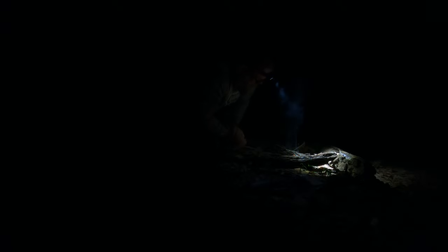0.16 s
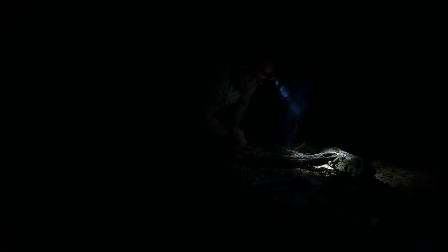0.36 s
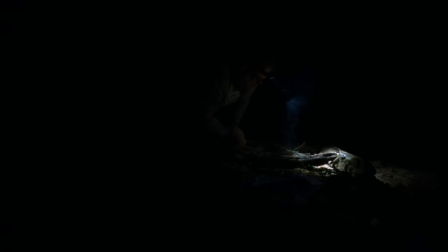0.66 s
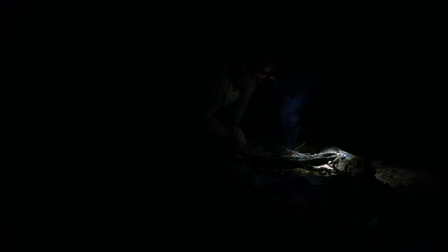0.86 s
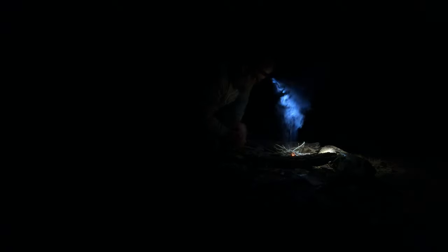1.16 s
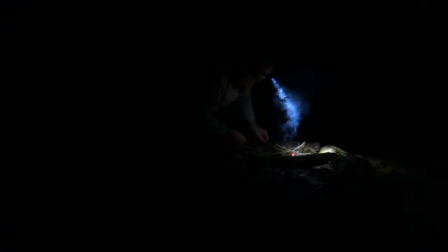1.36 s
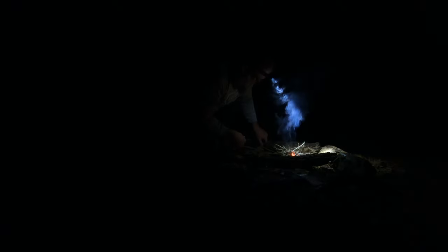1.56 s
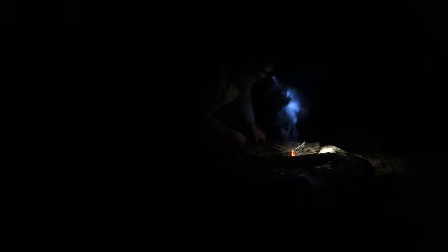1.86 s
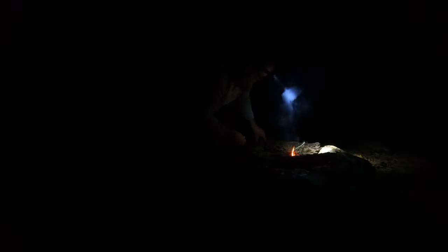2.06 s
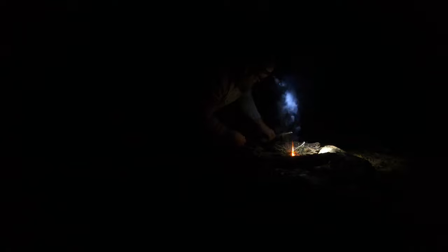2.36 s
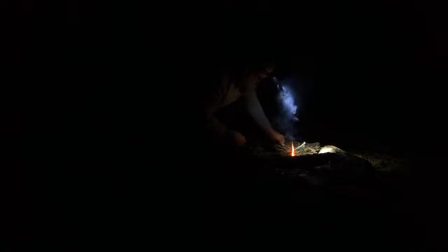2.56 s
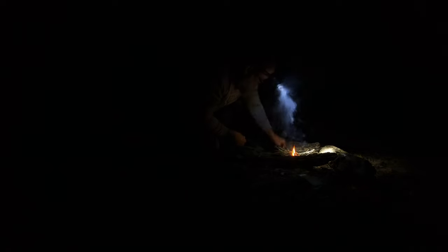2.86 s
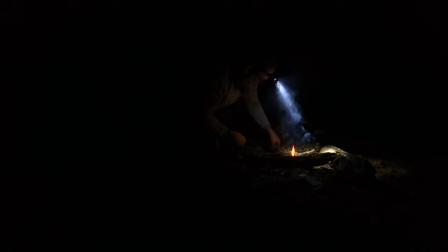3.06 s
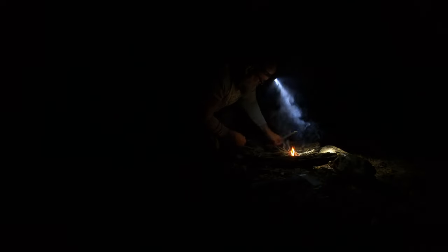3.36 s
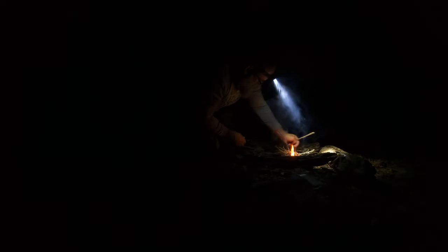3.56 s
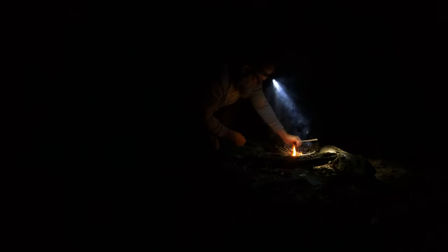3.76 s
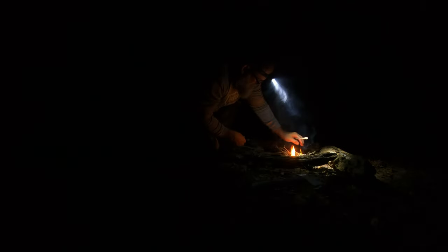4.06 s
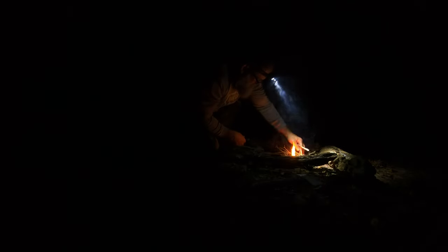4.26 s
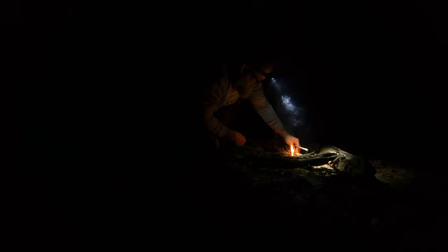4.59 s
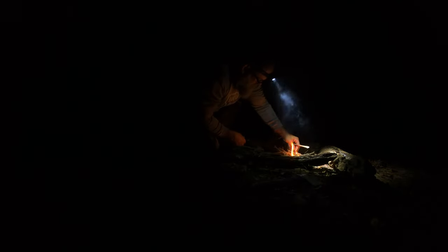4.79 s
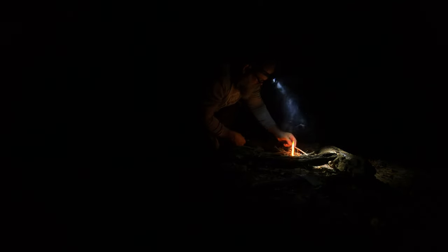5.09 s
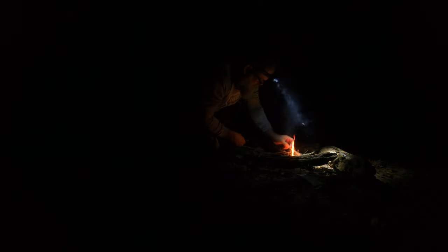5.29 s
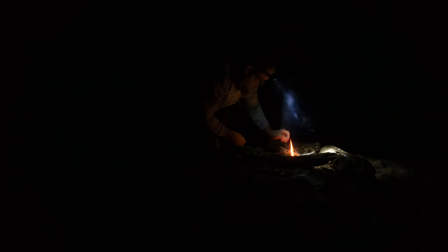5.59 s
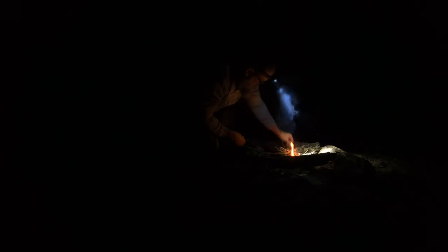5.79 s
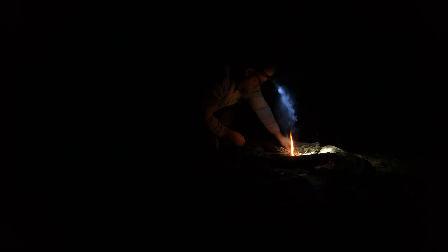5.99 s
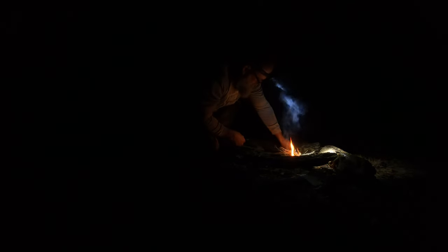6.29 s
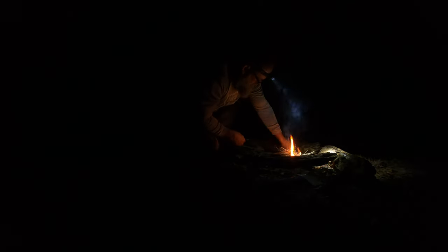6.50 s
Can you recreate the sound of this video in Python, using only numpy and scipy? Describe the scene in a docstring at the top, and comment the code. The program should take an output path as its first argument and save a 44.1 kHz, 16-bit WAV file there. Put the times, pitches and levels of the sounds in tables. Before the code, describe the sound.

Someone tends a small twig fire in dark woods. Dry sticks crack brightly, fine litter crackles and hisses after each break, and a stick knocks faintly. The strongest cracks come mid-way, with the background dipping briefly behind them; later snaps are weaker. Steady insect trills fill the wide stereo field, nearest ones mostly left, over wind rumble, faint low whistle and soft leaves. Soft thuds close the stretch.

```python
"""A campsite at night. From the first moment insects trill in two bands, near singers pulsing over a far blur.
A breeze rumbles on the microphone throughout, whistles faintly round the camera body and stirs the leaves.
Before the first second is out a small fire snaps and a stick knocks; crumbling litter rustles after them.
Dull thuds come through the ground at 1.6 s and near the end. The two loudest snaps fall at 2.6 and 3.5 s;
the trees scatter each snap, and the camera ducks its gain after loud peaks."""
import sys
import numpy as np
from scipy import signal
from scipy.fft import rfft, irfft, next_fast_len
from scipy.io import wavfile
from scipy.ndimage import uniform_filter1d, map_coordinates

SR = 44100
rng = np.random.default_rng(int(sys.argv[2]) if len(sys.argv) > 2 else 0)


def digitize_waveform(pressure):
    """Quantize a signal to 16-bit integers and store it at the path in sys.argv[1].

    Rows of a 2-D input are taken as channels; values are limited to [-1, 1].
    """
    field = np.atleast_2d(pressure).T
    bounded = np.clip(field, -1, 1)
    quanta = np.round(bounded * 32767).astype(np.int16)
    wavfile.write(sys.argv[1], SR, quanta)


N = 292824


def amp(db):
    """Turn dB into gain."""
    return 10 ** (np.asarray(db) / 20)


def unit(x):
    """Scale to an rms of 1."""
    return x / np.sqrt(np.mean(x ** 2) + 1e-20)


def peak(x):
    """Scale so the highest point is 1."""
    return x / np.abs(x).max()


def along(points, hz):
    """Read a curve of (Hz, value) points on a log frequency axis."""
    point_hz, value = np.transpose(points)
    return np.interp(np.log(hz + 1), np.log(point_hz + 1), value)


def curves(rows):
    """Give one value per sample for each column after the time."""
    s, *columns = np.transpose(rows)
    return [np.interp(np.arange(N) / SR, s, column) for column in columns]


def wobble(rate):
    """Draw a smooth random curve with so many knots a second."""
    knots = rng.standard_normal(int(N * rate / SR) + 4)
    return map_coordinates(knots, [np.arange(N) * rate / SR])


def filtered(x, response):
    """Filter x by a complex response of frequency."""
    m = next_fast_len(x.shape[-1] + SR // 2)  # silence at the end leaves room for ringing
    spectrum = rfft(x, m) * response(np.fft.rfftfreq(m, 1 / SR))
    return irfft(spectrum, m)[..., :x.shape[-1]]


def modes(table):
    """Add up a few resonances, every second one with its sign flipped."""
    def response(f):
        return sum((-1) ** k * amp(db) * 1j * f * width / (hz * hz - f * f + 1j * f * width)
                   for k, (hz, width, db) in enumerate(table))
    return response


def sides(pan_db):
    """Left and right gains that differ by pan_db; positive is louder on the left."""
    return amp([[pan_db / 2], [-pan_db / 2]])


def late_left(x, lag):
    """A source on the right reaches the left port later, by lag samples."""
    return filtered(x, lambda hz: np.exp(-1j * np.pi * hz * lag / SR * np.array([[1], [-1]])))


def rush(spectrum, alike, pan_db, patchy_db, lag=0):
    """Stereo noise with a given colour and likeness of the two sides, in patches of random gain."""
    z = signal.stft(rng.standard_normal((2, N)), nperseg=512)[2]
    # smooth the random gains across frequency, then across time
    field = uniform_filter1d(rng.standard_normal(z.shape[1:]), size=5, axis=0)
    field = uniform_filter1d(field, size=16, axis=1)
    pair = signal.istft(z * amp(patchy_db * unit(field)), nperseg=512)[1][:, :N]
    coloured = filtered(pair, lambda hz: amp(along(spectrum, hz)))
    turn = np.arccos(np.clip(alike, -1, 1)) / 2
    mid, side = coloured * [[np.cos(turn)], [np.sin(turn)]]
    return sides(pan_db) * late_left(unit(np.array([mid + side, mid - side])), lag)


def add(track, s, sound):
    """Mix a sound in at s seconds."""
    part = track[:, round(s * SR):][:, :sound.shape[1]]
    part += sound[:, :part.shape[1]]


# how long the trees keep scattering each pitch: (pitch_hz, fade_by_60_db_s)
TREE_FADE = [(500, 0.18), (3000, 0.77), (8000, 0.62), (14000, 0.07)]


def trees(length):
    """Trees scatter sound into one noisy tail per ear; each frequency dies at its own speed."""
    hz, t, z = signal.stft(rng.standard_normal((2, int(length * SR))), SR, nperseg=256)
    fade = amp(-60 * t / along(TREE_FADE, hz)[:, None])
    tail = signal.istft(z * fade, SR, nperseg=256)[1]
    return tail / np.linalg.norm(tail[0])


# pulse rate at the middle pitch, and how much it grows per Hz: higher singers pulse faster
MIDDLE_HZ, PULSES_PER_S, PULSES_PER_HZ = 3640, 32.3, .0047


def trill(length, hz, tempo=1):
    """Short tone pulses at a steady rate; a weaker voice sounds near half the pitch."""
    t = np.arange(int(length * SR)) / SR
    rate = tempo * (PULSES_PER_S + PULSES_PER_HZ * (hz - MIDDLE_HZ))
    beat = rate * t
    since = beat % 1 / rate  # seconds since this pulse began
    # each pulse gets its own loudness, pitch and phase
    chance = rng.standard_normal((int(beat[-1]) + 1, 3))[beat.astype(int)]
    pulse = since ** 2 * np.exp(-since / .0034) * amp(2. * chance[:, 0])
    # the pitch rises into the trill and sags at its end
    arc = 1 - 0.018 * (2 * t / length - 1) ** 2
    turn = 2 * np.pi * hz * arc * (1 + .006 * chance[:, 1]) * since
    tone = np.sin(turn + 9 * chance[:, 2]) + amp(-17.0) * np.sin(.53 * turn)
    swell = np.clip(np.minimum(t / 0.054, (length - t) / 0.022), 0, 1)
    return unit(pulse * tone) * swell


# the nearest singers: (start_s, length_s, pitch_hz, level_db, left_minus_right_db)
NEAREST_TRILLS = [(.009, 0.47, 4050, -54.5, 9), (.009, 0.29, 3500, -59, 5), (0.606, 0.83, 3850, -60, -8),
                  (0.771, 0.5, 3649, -46, 9), (1.552, 0.44, 3894, -48.5, 11.5),
                  (2.104, 0.3, 3467, -58.5, 23), (2.989, 0.41, 4090, -51, 0), (3.035, 0.5, 3648, -49, 9.5),
                  (3.765, 0.43, 3880, -57, 13), (4.155, 0.55, 3758, -48, -2), (4.856, 0.47, 3536, -52, 10),
                  (5.292, 0.58, 3797, -55.5, 16.5), (5.872, 0.41, 4030, -48.5, 3),
                  (5.891, 0.41, 3630, -49.5, 10.5)]


def near_singers():
    """Insects close enough to keep their separate pulses, with an echo from the trees."""
    near = np.zeros((2, N))
    for s, length, hz, db, pan_db in NEAREST_TRILLS:
        add(near, s, amp(db) * sides(pan_db) * trill(length, hz))
    # a crowd a little farther off takes turns, each at its own tempo
    for k, (when, pitch, loud, pan, pace) in enumerate(rng.uniform(size=(100, 5))):
        song = trill(0.498, 3400 + 750 * pitch, .85 + .4 * pace)
        add(near, (k + when) / 100 * N / SR, amp(-59.0 + 5. * loud) * sides(8 * pan) * song)
    near = late_left(near, 1.95)
    echo = signal.fftconvolve(near.mean(0)[None], trees(.4), axes=1)[:, :N]
    return near + amp(-6) * echo


# loudness of the far singers: (time_s, high_band_db, low_band_db)
FAR_LEVELS = [(0.0, -40, -54.5), (0.7, -43.5, -56), (0.91, -42.5, -56), (2.31, -42, -55.5),
              (2.77, -41, -53.5), (3.31, -42, -55), (3.66, -42, -52), (4.36, -43.5, -56),
              (6.01, -41, -53.5), (6.64, -43.5, -54.5)]
# colour of the high band: (pitch_hz, relative_db_per_hz)
HIGH_BAND = [(1590, -72), (2700, -34.5), (3000, -22), (3160, -16.5), (3250, -9), (3420, -3.5), (3650, 2),
             (4000, -4.5), (4250, -7.5), (4600, -11), (4800, -18.5), (5320, -20.5), (6200, -50),
             (8060, -78.5), (13600, -120)]
# colour of the low band: (pitch_hz, relative_db_per_hz)
LOW_BAND = [(850, -30), (1450, -28.5), (1680, -14), (1920, -0.5), (2020, 2), (2350, -17.5), (2600, -34),
            (3380, -63), (5720, -120)]
# colour of far, high insects: (pitch_hz, relative_db_per_hz)
HIGH_INSECTS = [(4500, -2), (6300, -5.5), (7500, 1), (9200, -5), (10200, -21.5), (12500, -16.5),
                (15600, -31.5), (15900, -71.5)]


def far_singers():
    """So many far insects overlap that they blur into two rough bands and a faint high hiss."""
    high_db, low_db = curves(FAR_LEVELS)
    far = amp(high_db) * rush(HIGH_BAND, .3, pan_db=4.5, patchy_db=.6, lag=2.)
    far += amp(low_db) * rush(LOW_BAND, 0.96, pan_db=2.0, patchy_db=1.3, lag=3.1)
    return far + amp(-67.0) * rush(HIGH_INSECTS, 0.03, pan_db=-1.0, patchy_db=1.5)


def insects():
    """The whole chorus: separate pulses up close over a far blur."""
    return near_singers() + far_singers()


# kindling snaps, levels before the treble is dulled:
# (start_s, thin_wood_peak_db, thick_minus_thin_wood_db, splinters_against_break_db)
KINDLING_SNAPS = [(0.6903, -14.5, -23.5, -18), (1.8143, -40, -14, -14), (2.04, -33.5, -23, -18),
                  (2.312, -35, -30, -9), (2.56, 9.5, -20, -25.5), (2.6309, -22, -18, -19),
                  (2.662, -25.5, -26, -16), (2.765, -38, -4, -8), (3.052, -31, -14.5, -23.5),
                  (3.356, -36, 5.5, -20), (3.538, 5.5, -18.5, -23), (3.6665, -28, -13, -14.5),
                  (3.6817, -13.5, -18.5, -14), (4.4667, -42, -13, -9), (4.4946, -34.5, -3.5, -21),
                  (4.7091, -17.5, -24, -23), (4.7845, -36, -10, -12), (4.8164, -36, -21, -16),
                  (5.405, -38.5, -20, -10)]
# how thin dry wood rings: (pitch_hz, width_hz, level_db)
THIN_WOOD = [(4790, 1730, -1.5), (8500, 1030, 1), (11760, 3100, -6)]
# how thicker wood rings: (pitch_hz, width_hz, level_db)
THICK_WOOD = [(1150, 153, 8), (481, 380, -1), (2140, 870, 6.5), (220, 190, -4)]
# treble corner of a 0 dB snap; weaker snaps are a little duller
BRIGHT_HZ, DULLER_PER_DB = 10800, .004


def snaps():
    """A sharp blow rings thin and thick wood, with splinters, a smeared echo and a tail from the trees."""
    out, t = np.zeros((2, N)), np.arange(SR // 20) / SR
    for s, db, body_db, splinter_db in KINDLING_SNAPS:
        # fibres tear faintly for a millisecond before the break and shower after it
        fibres = rng.standard_normal((3, len(t)))
        shower = amp(-60 * np.clip(t - .001, 0, 1) / .014) * np.where(t < .001, .35, 1)
        echo = amp(-38 - 60 * (t - .012) / .025) * (t > .012)
        both_ears = fibres[0] + .5 * fibres[1:]  # one shared noise and one for each ear
        blow = (amp(splinter_db) * shower + echo) * both_ears
        blow[:, SR // 1000] += 1  # the break itself
        thin = peak(filtered(blow, modes(THIN_WOOD)))
        thick = peak(filtered(blow, modes(THICK_WOOD))) * amp(body_db)
        corner_hz = BRIGHT_HZ * np.exp(DULLER_PER_DB * db)
        snap = filtered(thin + thick, lambda hz: 1 / (1 + 1j * hz / corner_hz) ** 3)
        add(out, s, amp(db) * snap)
        add(out, s + 0.0073, amp(db - 26) * signal.fftconvolve(snap, trees(0.17), axes=1))
    return out


# sticks laid down or ticking: (start_s, level_db, pitch_hz, fade_by_60_db_s)
STICK_KNOCKS = [(0.812, -49, 1320, 0.023), (1.587, -37, 553, 0.035), (5.405, -42, 5730, 0.02),
                (5.830, -40, 616, .025)]
# extra tones in a knock: (multiple_of_pitch, level_db, share_of_fade_time)
STICK_OVERTONES = [(1.62, -7, 0.6), (2.3, -9, 0.51), (3.3, -8, .3)]
BOUNCE_S, BOUNCE_DB = .011, -12  # a stick lands twice


def knocks():
    """A stick rings at a few fading tones with a short burst of contact noise, then bounces once."""
    out, t = np.zeros((2, N)), np.arange(SR // 20) / SR
    for s, db, hz, t60 in STICK_KNOCKS:
        ring = np.zeros(len(t))
        for multiple, tone_db, share in [(0.99, 0, 0.83)] + STICK_OVERTONES:
            if multiple * hz < 12000:
                ring += amp(tone_db - 60 * t / (share * t60)) * np.sin(2 * np.pi * multiple * hz * t)
        attack = 1 - np.exp(-t / 0.00096)
        contact = amp(-60 * t / 0.0046) * uniform_filter1d(rng.standard_normal(len(t)), size=16)
        knock = (ring * attack + .5 * contact)[None]
        add(out, s, amp(db) * knock)
        add(out, s + BOUNCE_S, amp(db + BOUNCE_DB) * knock)
    return out


# samples by which the left port hears the fire late
FIRE_LAG = 1.75
# the camera shades its left port from the fire: (pitch_hz, left_minus_right_db)
FIRE_SHADE = [(200, -1), (1500, -2), (4400, -1), (8000, -3), (15000, -7)]


def fire():
    """Snaps and knocks reach the left port late and shaded by the camera."""
    heard = late_left(snaps() + knocks(), FIRE_LAG)
    return filtered(heard, lambda hz: amp(np.array([[.5], [-.5]]) * along(FIRE_SHADE, hz)))


# kindling and litter crumbling after a break or under a hand:
# (start_s, rise_s, fade_by_60_db_s, level_db)
RUSTLES = [(.695, 0.0047, 0.26, -50), (1.18, 0.047, 0.41, -54), (2.575, 0.0082, 0.4, -46.5),
           (2.62, 0.075, 0.71, -41.5), (2.73, 0.033, 0.23, -57), (3.18, 0.071, 0.99, -57.5),
           (3.329, 0.035, 0.35, -69), (3.552, 0.0059, 0.38, -43), (3.66, 0.014, 0.51, -44),
           (3.76, 0.028, 0.23, -53), (4.45, 0.032, 0.77, -54.5), (4.72, 0.017, 0.34, -55.5),
           (4.78, 0.023, 0.16, -56), (5.4, .02, 0.44, -65), (5.57, 0.031, 0.19, -51),
           (5.85, 0.06, 0.72, -60.5)]
# colour of the crumbling litter: (pitch_hz, relative_db_per_hz)
LITTER_COLOUR = [(500, -16), (1200, -6), (2500, -4), (4000, 2), (7000, -2.5), (10000, -10), (13000, -17.5),
                 (14800, -22), (15900, -70)]
# average crackle rate before clumping, fade time constant, and spread of the clumps
CRACKLES_PER_S, CRACKLE_S, CLUMP_DB = 550, .001, 3


def crumble():
    """Each rustle is clumps of tiny crackles over rough hiss."""
    t, level = np.arange(N) / SR, np.zeros(N)
    for s, rise, t60, db in RUSTLES:
        since = np.clip(t - s, 0, None)
        level += amp(db - 60 * since / t60) * (1 - np.exp(-since / rise))
    busy = amp(CLUMP_DB * wobble(60))
    strikes = rng.uniform(size=N) < busy * CRACKLES_PER_S / SR
    sizes = strikes * amp(rng.uniform(-18, 0, size=N))
    bursts = signal.lfilter([1], [1, -np.exp(-1 / (CRACKLE_S * SR))], sizes)
    grains = bursts * rush(LITTER_COLOUR, .6, pan_db=-2.5, patchy_db=4.)
    hiss = np.sqrt(busy) * rush(LITTER_COLOUR, .3, pan_db=-2.5, patchy_db=3.)
    return level * (.8 * hiss + .5 * unit(grains))


# dull thuds on the ground: (start_s, level_db, pitch_hz)
GROUND_THUDS = [(1.585, -48, 90.5), (5.59, -37, 89), (5.83, -43, 150), (5.91, -38, 90)]
THUMP_T60 = 0.078  # seconds to fade by 60 dB


def thumps():
    """The ground gives a soft low push that dies quickly, alike on both ports."""
    out, t = np.zeros((2, N)), np.arange(SR // 8) / SR
    for s, db, hz in GROUND_THUDS:
        fade = amp(db - 60 * t / THUMP_T60)
        attack = 1 - np.exp(-t / .002)
        add(out, s, fade * np.sin(2 * np.pi * hz * t)[None] * attack)
    return out


# uneven level of the wind rumble, with quick swells and lulls, before extra random wobble:
# (time_s, level_db)
RUMBLE_LEVEL = [(0, -56), (.2, -46), (.6, -54.5), (1.3, -54.5), (1.52, -60), (1.62, -48.5), (2.05, -56.5),
                (2.35, -49.5), (2.8, -50), (3.7, -53.5), (3.9, -48), (4.3, -59), (4.6, -49), (4.94, -53.5),
                (5.15, -46.5), (5.3, -55), (5.55, -62), (5.65, -53.5), (6.02, -48.5), (6.3, -57),
                (6.64, -52.5)]
# colour of the wind rumble: (pitch_hz, relative_db_per_hz)
RUMBLE_COLOUR = [(12, -34.5), (20, 0), (80, -3), (106, 0), (122, -7), (160, -24.5), (260, -61.5),
                 (440, -120)]
# level of the low roar, before its random wobble: (time_s, level_db)
ROAR_LEVEL = [(0, -59.5), (1, -61.5), (2.2, -60), (3.2, -61), (4.1, -63.5), (5, -60), (6, -56),
              (6.64, -60.5)]
# colour of the steadier low roar above the rumble: (pitch_hz, relative_db_per_hz)
ROAR_COLOUR = [(60, -56.5), (110, -9.5), (140, -2), (200, -3.5), (260, -9), (440, -60), (900, -120)]
GUST_DB, GUSTS_PER_S = 3, 16  # spread of the extra random wobble, and its knots a second


def wind_rumble():
    """Air pushing on the microphone makes low noise, nearly alike on both ports, with a steadier roar."""
    rumble_db = curves(RUMBLE_LEVEL)[0] + GUST_DB * wobble(GUSTS_PER_S)
    roar_db = curves(ROAR_LEVEL)[0] + 1.4 * wobble(6.)
    rumble = amp(rumble_db) * rush(RUMBLE_COLOUR, .96, pan_db=0.0, patchy_db=0.5)
    return rumble + amp(roar_db) * rush(ROAR_COLOUR, 0.83, pan_db=1.5, patchy_db=0.5)


# middle pitch of the whistle, before its random wobble: (time_s, pitch_hz)
WHISTLE_PITCH = [(0, 240), (.1, 225), (.22, 240), (.42, 210), (.65, 195), (.8, 225), (1.07, 252),
                 (1.35, 229), (1.55, 234), (1.71, 194), (1.82, 238), (1.96, 257), (2.06, 230), (2.15, 245),
                 (2.28, 217), (2.48, 249), (2.6, 242), (2.85, 264), (3.12, 269), (3.35, 314), (3.5, 281),
                 (3.7, 315), (3.96, 256), (4.2, 305), (4.33, 300), (4.54, 251), (4.63, 268), (4.72, 248),
                 (5.05, 259), (5.25, 222), (5.39, 247), (5.49, 214), (5.75, 232), (5.95, 211), (6.33, 201),
                 (6.5, 277), (6.64, 310)]
# tone level at 250 Hz before the two port gains; fainter as it rises
WHISTLE_DB, WHISTLE_DB_PER_OCTAVE = -54.5, -1.5


def whistle():
    """Vortices shed round the camera body, never quite steadily, sing a tone opposed between the ports."""
    hz, = curves(WHISTLE_PITCH)
    unsteady_hz = hz * (1 + 0.01537 * wobble(14) + 0.02766 * wobble(45))
    tone = np.sin(2 * np.pi * np.cumsum(unsteady_hz) / SR)
    db = WHISTLE_DB + WHISTLE_DB_PER_OCTAVE * np.log2(hz / 250)
    db += 1.6 * wobble(6.1) + 2.27 * wobble(30)
    return amp(db) * tone * [[.52], [-1.4]]


# colour of the distant murmur of leaves: (pitch_hz, relative_db_per_hz)
LEAF_COLOUR = [(130, -16), (200, 4.5), (300, 0.5), (550, -3), (750, -13.5), (1300, -12), (2600, -25.5),
               (5500, -14), (9000, -54.5), (15600, -51), (15900, -84.5)]


def leaves():
    """Many distant leaves blend into a soft, wide, patchy noise."""
    return amp(-62) * rush(LEAF_COLOUR, 0.073, pan_db=-6.5, patchy_db=2.0)


def breeze():
    """Moving air is heard as rumble, whistle and leaves."""
    return wind_rumble() + whistle() + leaves()


def scene():
    """Everything that reaches the microphone."""
    return insects() + fire() + crumble() + thumps() + breeze()


TOP_HZ = 16400  # band limit


def record(dry):
    """Loud peaks pull the gain down for a moment; the converter clips; the band limit cuts the top."""
    excess = np.clip(np.abs(dry).max(0) - .15, 0, 1)
    keep = np.exp(-1 / (.2 * SR))  # the gain recovers with a time constant of 0.2 s
    late_excess = np.roll(excess, SR // 250)  # the gain reacts 4 ms late
    duck_db = 4.5 * np.tanh(.3 * signal.lfilter([1], [1, -keep], late_excess))
    clipped = np.clip(dry * amp(-duck_db), -1, 1)
    return filtered(clipped, lambda hz: 1 / (1 + (hz / TOP_HZ) ** 60))


dry = scene()
out = record(dry)
digitize_waveform(out)
```